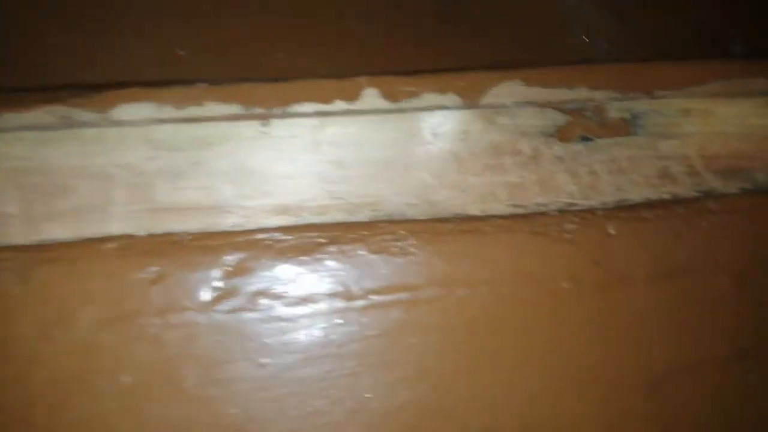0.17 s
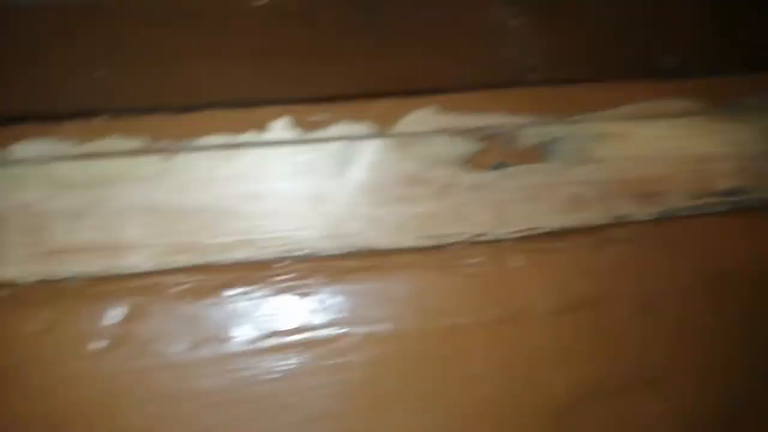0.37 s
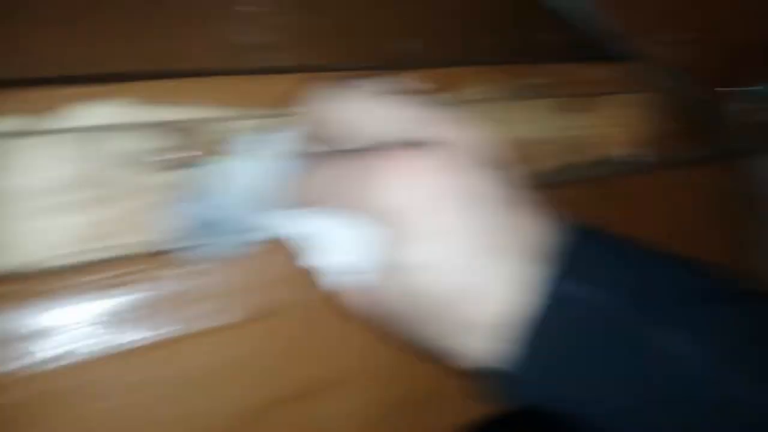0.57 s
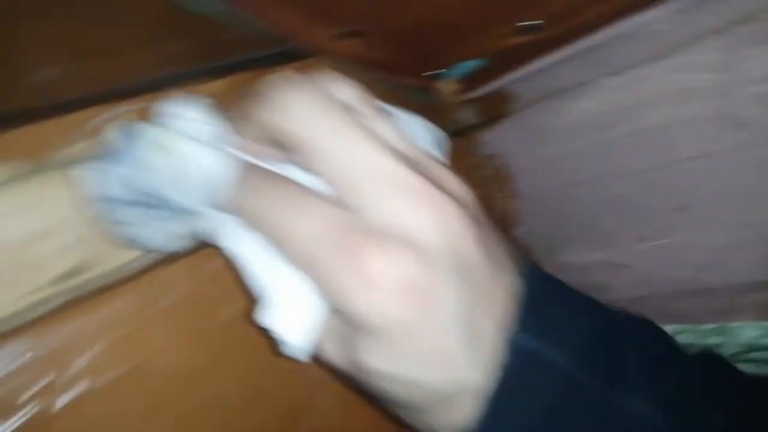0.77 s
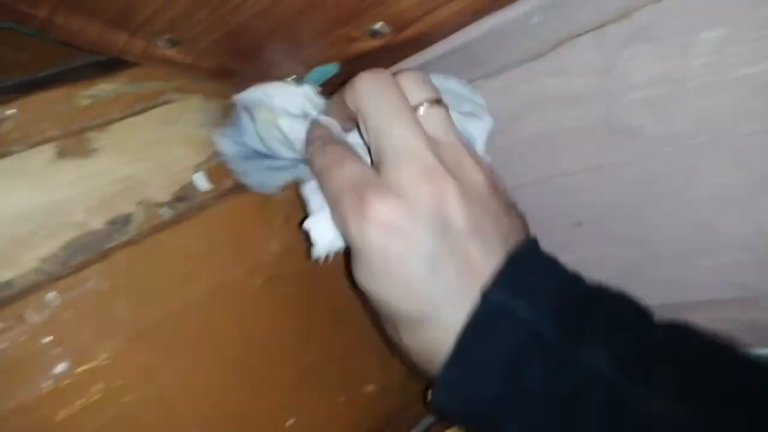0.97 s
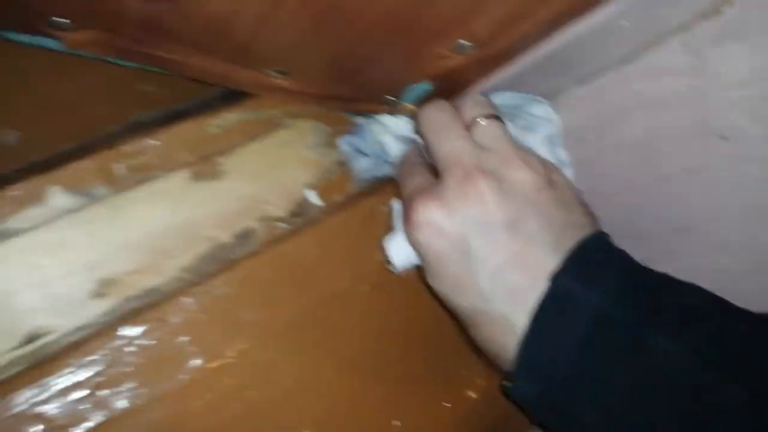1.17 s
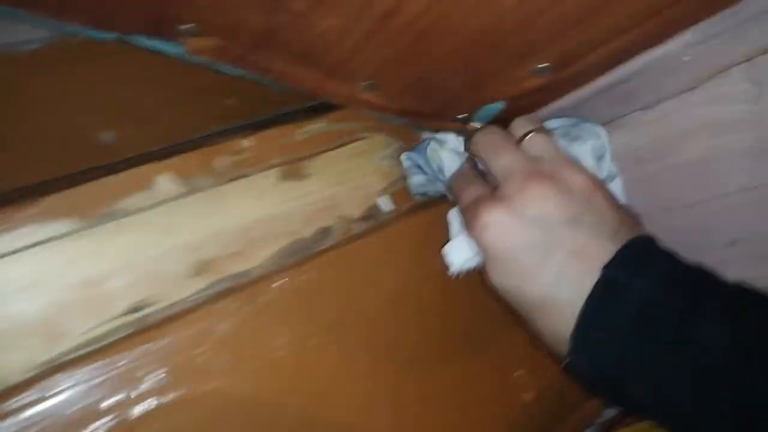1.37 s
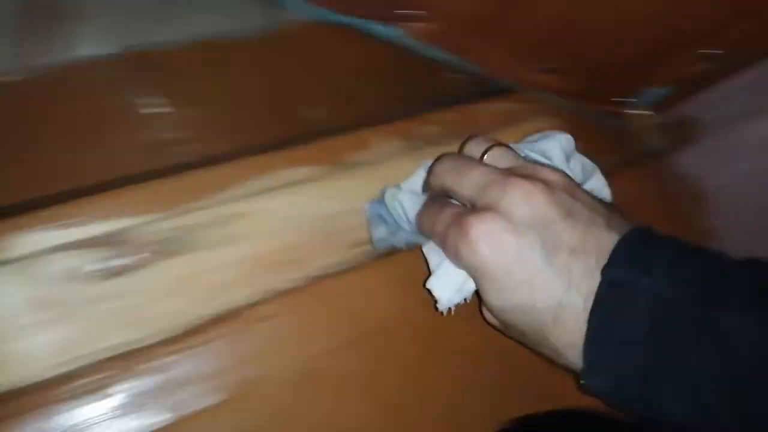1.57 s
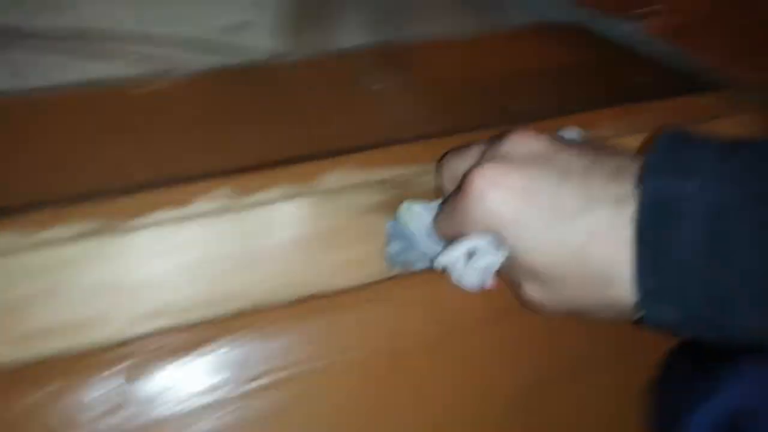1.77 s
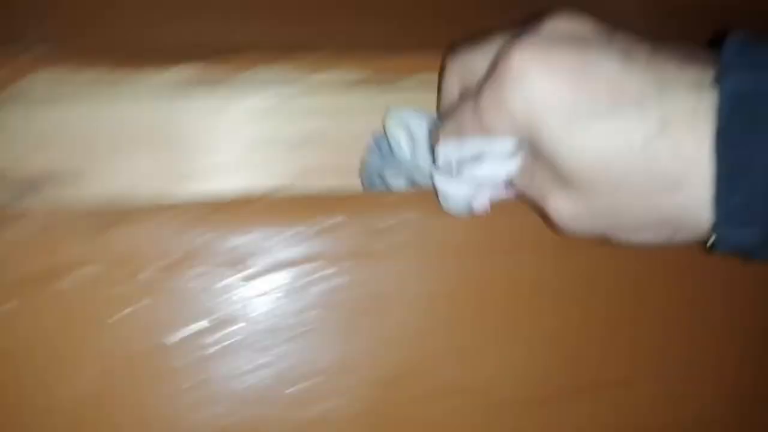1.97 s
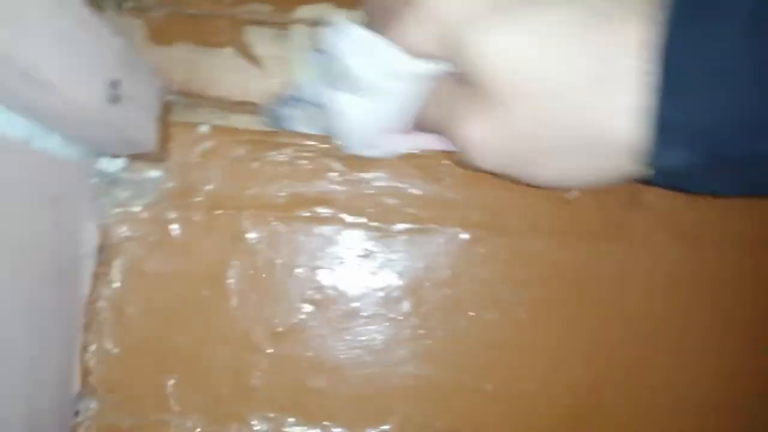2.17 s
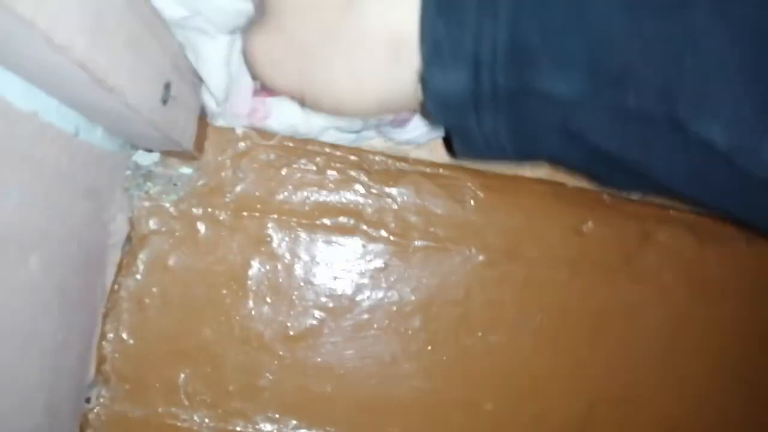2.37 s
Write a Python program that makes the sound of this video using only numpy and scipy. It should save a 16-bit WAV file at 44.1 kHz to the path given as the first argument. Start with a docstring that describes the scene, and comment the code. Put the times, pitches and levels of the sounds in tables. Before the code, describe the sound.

A cloth rag rubs varnished wood, close and dry. A faint brief scuff with a soft bump comes at 0.1 s, then a full wipe swells from 0.35 to 0.7 s, loudest near 0.5. Near silence follows, with a light knock at 0.9 and a faint brush around 1.15. After a soft bump at 1.4, sharp ticks at 1.5 open brisk scrubbing, strongest at 1.6, easing until about 2.3. Low arm rumble and faint hum lie beneath.

```python
"""A rag is wiped to and fro along a varnished wooden door, close to a hand-held microphone.
Its fibres slip in a dense rush of random pulses, coloured by panel resonances, reflections and grip.
It snags on rough spots with small ticks of filtered noise; two soft bumps and a light knock ring modes.
Rumble of the moving arm and a quiet room lie beneath, as shaped noise, with a faint steady hum, a sine
that a noise suppressor lets through by a table of levels."""
import sys
import numpy as np
from scipy import signal
from scipy.fft import rfft, irfft
from scipy.io import wavfile

SR = 44100
rng = np.random.default_rng(int(sys.argv[2]) if len(sys.argv) > 2 else 0)


def int16_out(signal):
    """Quantize to a 16-bit WAV file."""
    q = np.round(np.clip(np.atleast_2d(signal).T, -1, 1) * 32767)
    wavfile.write(sys.argv[1], SR, q.astype(np.int16))


N = 106016
T = np.arange(N) / SR  # time, s


def from_db(db):
    """Level law: decibels to amplitude gain."""
    return 10 ** (np.asarray(db) / 20)


def rms_one(x):
    """Normalisation: scale to unit power."""
    return x / np.sqrt(np.mean(x ** 2) + 1e-20)


def in_time(rows):
    """Linear interpolation: each column of a table against time."""
    start_s, *columns = np.transpose(rows)
    return [np.interp(T, start_s, column) for column in columns]


def coloured(x, points):
    """Spectral shaping: weight a sound by a curve over log frequency, at unit power."""
    pitch_hz, level_db = np.transpose(points)
    bin_hz = np.maximum(np.arange(N // 2 + 1) * SR / N, 1)
    curve_db = np.interp(np.log(bin_hz), np.log(pitch_hz), level_db)
    return rms_one(irfft(rfft(x) * from_db(curve_db), N))


def drift(corner_hz):
    """Low-passed noise: slow random fluctuation with a spread of one."""
    bin_hz = np.arange(N // 2 + 1) * SR / N
    spectrum = rfft(rng.standard_normal(N)) / (1 + (bin_hz / corner_hz) ** 2)
    return rms_one(irfft(spectrum, N))


def lowpass(x, order, corner_hz):
    """Butterworth low-pass: a flat passband below a smooth roll-off."""
    return signal.sosfilt(signal.butter(order, corner_hz, fs=SR, output="sos"), x)


def resonance(x, pitch_hz, width_hz):
    """Two-pole resonance: a band about one frequency, with about unit gain on top."""
    radius = np.exp(-np.pi * width_hz / SR)
    zeros = np.array([1, 0, -1]) * (1 - radius ** 2) / 2
    poles = [1, -(1 + radius ** 2) * np.cos(2 * np.pi * pitch_hz / SR), radius ** 2]
    return signal.lfilter(zeros, poles, x + 1e-18)


def ring(force, modes):
    """Modal superposition: a force excites decaying sinusoids."""
    out = np.zeros(N)
    for pitch_hz, level_db, t60_s in modes:
        radius = from_db(-60 / (t60_s * SR))
        angle = 2 * np.pi * pitch_hz / SR
        poles = [1, -2 * radius * np.cos(angle), radius ** 2]
        out += from_db(level_db) * signal.lfilter([0, np.sin(angle)], poles, force + 1e-18)
    return out


def decay(start_s, length_s):
    """Exponential relaxation: a sudden start, falling to 1/e in one length."""
    return (T >= start_s) * np.exp(-np.abs(T - start_s) / length_s)


def swell(centre_s, half_length_s):
    """Gaussian envelope: a smooth rise and fall, 1/e at the half length."""
    return np.exp(-((T - centre_s) / half_length_s) ** 2)


# strokes of the rag, levels of the rubbing: start_s [s], middle_db, upper_middle_db, treble_db [dB]
WIPE_LEVELS = [
    [(0.0, -71, -62.5, -56), (0.02, -62, -66, -56), (0.026, -62.5, -56, -54), (0.068, -53, -51.5, -45.5),
     (0.095, -57.5, -51.5, -52.5)],
    [(0.122, -62, -56.5, -49.5), (0.128, -67, -64, -60), (0.154, -72.5, -72, -72), (0.184, -74.5, -73, -85),
     (0.236, -85, -78, -77), (0.254, -73.5, -67, -67), (0.302, -73, -70, -66.5), (0.32, -66, -70, -67)],
    [(0.33, -60, -61.5, -56), (0.398, -47.5, -52.5, -51), (0.408, -53.5, -49.5, -56.5),
     (0.486, -41.5, -40.5, -45), (0.55, -44, -43.5, -44), (0.59, -53.5, -52, -52),
     (0.678, -55.5, -59, -57.5), (0.78, -85, -93, -95), (0.86, -82, -79.5, -80)],
    [(0.95, -85, -86, -98), (1.058, -94, -96, -86.5), (1.14, -60, -63, -54.5), (1.182, -61, -62, -56.5),
     (1.242, -79.5, -77.5, -72), (1.266, -83, -89, -96), (1.308, -82.5, -74.5, -72.5),
     (1.378, -71.5, -67, -61.5), (1.47, -71, -68.5, -71)],
    [(1.525, -56, -57.5, -47.5), (1.537, -44.5, -45.5, -46), (1.551, -44.5, -47, -42),
     (1.587, -47, -50.5, -47.5), (1.601, -38, -39.5, -47), (1.615, -41.5, -46, -48),
     (1.649, -44.5, -45, -46.5), (1.7, -47.5, -52, -49)],
    [(1.72, -46.5, -44, -51.5), (1.728, -49.5, -48, -45.5), (1.75, -50.5, -51, -49.5),
     (1.778, -47.5, -49.5, -48), (1.82, -54.5, -53.5, -53), (1.88, -49.5, -49.5, -49.5),
     (1.974, -59, -55.5, -52), (1.99, -52.5, -53, -49), (2.05, -52, -52.5, -52)],
    [(2.07, -51.5, -47, -47.5), (2.104, -49.5, -52, -50), (2.17, -48.5, -54.5, -49.5),
     (2.192, -54, -62.5, -55.5), (2.224, -46, -55, -55), (2.232, -53, -60, -56),
     (2.246, -48.5, -58.5, -59.5), (2.372, -67, -66.5, -66), (2.4, -64.5, -64, -64.5)],
]
# bass of the rubbing passed into the door: start_s [s], level_db [dB]
DOOR_BASS_LEVEL = [(0, -70), (.08, -58), (.16, -79), (.3, -76), (.4, -53.5), (.48, -49), (.54, -44),
                   (.6, -56), (.69, -55), (.78, -74.5), (1.07, -83.5), (1.16, -56.5), (1.26, -93),
                   (1.46, -63), (1.54, -53), (1.62, -52.5), (1.78, -57.5), (1.96, -61.5), (2.07, -52),
                   (2.19, -74), (2.4, -92)]
# borders between bass, middle, upper middle and treble: pitch_hz [Hz]
BAND_SPLITS_HZ = (420, 2500, 6000)
# colour of cloth on wood within the bands: pitch_hz [Hz], level_db [dB]
CLOTH_COLOUR = [(90, -1.5), (160, 2), (250, 1), (400, -3), (600, -3.5), (950, 1), (1500, -1), (2300, -2),
                (3700, -2), (4900, -3.5), (5700, -6.5), (7200, -6), (9200, -6), (11500, -12),
                (13500, -14.5), (15800, -21)]
SLIPS_PER_S, SLIP_SPREAD_DB = 7000, 2  # rate of fibre slips at full pressure; mean spread of their size
FUZZ_DB = -1.5  # smooth rush beneath the slips
PRESSURE_SHARE = 0.2  # share of the middle band's swing in dB that the slip rate follows
JUDDER_DB, JUDDER_HZ = 1.18, 15  # shared by all bands
FLICKER_DB, FLICKER_HZ = 0.68, 29  # separate in each band


def rag():
    """Stick-slip friction: random fibre slips, denser under pressure, swell with each wipe."""
    levels_db = in_time(DOOR_BASS_LEVEL) + in_time([row for wipe in WIPE_LEVELS for row in wipe])
    middle_db = levels_db[1]
    pressure = from_db(PRESSURE_SHARE * (middle_db - middle_db.max()))
    sizes = from_db(SLIP_SPREAD_DB * np.minimum(rng.exponential(1, N), 5))
    sizes = sizes * rng.choice([-1, 1], N)
    happens = rng.random(N) < SLIPS_PER_S * pressure / SR
    # the root keeps the mean power even while the density changes
    slips = rms_one(sizes * happens / np.sqrt(pressure))
    rush = slips + from_db(FUZZ_DB) * rng.standard_normal(N)
    stream = rush * from_db(JUDDER_DB * drift(JUDDER_HZ))
    rub = coloured(panel(reflected(stream)), CLOTH_COLOUR)
    below = []
    for split_hz in BAND_SPLITS_HZ:
        below.append(signal.sosfiltfilt(signal.butter(4, split_hz, fs=SR, output="sos"), rub))
    bands = np.diff([np.zeros(N), *below, rub], axis=0)
    out = np.zeros(N)
    for band, level_db in zip(bands, levels_db):
        flicker_db = FLICKER_DB * drift(FLICKER_HZ)
        out += rms_one(band) * from_db(level_db + flicker_db)
    return out


# close reflections as the hand travels between the sides of the frame:
# start_s [s], first_lag_ms [ms], second_lag_ms [ms], strength [0-1]
FRAME_REFLECTIONS = [(0, .82, .25, 0.07), (.25, 0.73, 0.27, 0.08), (.42, 1.1, 0.58, 0.11),
                     (.62, 0.79, 0.7, 0.08), (1.15, 0.89, 0.24, 0.14), (1.35, 1.05, 0.22, 0.14),
                     (1.6, 0.85, 0.24, 0.15), (1.85, 1.4, 0.61, 0), (1.97, 1.27, 0.834, 0.38),
                     (2.05, 0.89, 0.89, 0.19), (2.12, 0.72, 1.38, 0.28), (2.2, 0.67, 1.77, 0.33),
                     (2.31, 0.36, 1.92, 0.11)]


def reflected(x):
    """Comb interference: two reflections with moving lags, each bouncing twice, join the direct sound."""
    first_ms, second_ms, strength = in_time(FRAME_REFLECTIONS)
    out = x
    for lag_ms in (first_ms, second_ms):
        once = np.interp(T - lag_ms / 1000, T, x)
        twice = np.interp(T - 2 * lag_ms / 1000, T, x)
        out = out + strength * once + strength ** 2 * twice
    return out / np.sqrt(1 + 2 * strength ** 2)


# resonances of the panel that the rubbing excites: pitch_hz [Hz], width_hz [Hz], gain [linear]
PANEL_RESONANCES = [(167, 16, 0.3), (575, 37, 0.97), (712, 25, 0.36), (910, 22, 0.19), (1372, 34, 0.65),
                    (1458, 9, 0.17), (1564, 15, 0.32), (1832, 29, 0.35), (2192, 20, 0.29), (2600, 13, 0.32),
                    (3406, 32, 0.47), (3690, 60, 0.61), (4700, 12, 0.24), (9740, 24, 0.2)]


def panel(x):
    """Forced resonance: the door's narrow modes ring along with the rubbing."""
    return x + sum(gain * resonance(x, pitch_hz, width_hz) for pitch_hz, width_hz, gain in PANEL_RESONANCES)


# regions lifted or shaded by the changing grip:
# centre_s [s], half_length_s [s], pitch_hz [Hz], width_hz [Hz], gain_db [dB]
GRIP_SHADES = [(0.14, 0.56, 900, 270, 3), (.23, 0.16, 2900, 1900, -14), (0.74, 0.027, 1500, 350, 1),
               (0.4, 0.28, 22400, 3400, 10), (1.035, 0.082, 9400, 1400, 11),
               (1.083, 0.043, 16400, 2800, 18.5), (1.31, 0.15, 950, 350, 8.5), (1.31, 0.073, 3950, 740, 8),
               (2.004, 0.082, 1930, 390, 8.5), (2.06, .17, 6240, 2600, -11.5),
               (2.234, 0.067, 1230, 890, 4.5), (2.3, 0.016, 580, 130, 7), (1.453, 0.0065, 1300, 500, 11),
               (1.94, 0.13, 690, 610, -7), (1.4, 0.14, 540, 310, -4), (2.25, 0.027, 1840, 520, 4)]


def grip(x):
    """Time-varying filtering: hollows and folds under the hand colour the rubbing in passing."""
    for centre_s, half_length_s, pitch_hz, width_hz, gain_db in GRIP_SHADES:
        amount = (from_db(gain_db) - 1) * swell(centre_s, half_length_s)
        x = x + amount * resonance(x, pitch_hz, width_hz)
    return x


# catches on rough spots of the wood: start_s [s], level_db [dB], pitch_hz [Hz], width_hz [Hz], length_s [s]
ROUGH_SPOTS = [(.0800, -38, 3020, 4000, 0.0011), (0.0912, -34.5, 2160, 4060, 0.0012),
               (.3392, -38.5, 8200, 9000, .001), (0.3923, -28, 1400, 2200, 0.0016),
               (0.5465, -25.5, 2280, 4000, 0.00088), (1.4813, -16, 7650, 1960, 0.00034),
               (1.4816, -34.5, 4900, 504, 0.003), (1.5138, -24, 11000, 1500, 0.00056),
               (1.5374, -23, 9460, 1800, .0005), (1.584, -30.5, 3960, 3500, .0015),
               (1.5940, -35, 3800, 2470, 0.0011), (1.5988, -27.5, 2020, 3020, 0.00086),
               (2.074, -38.5, 2970, 3500, 0.0016)]
SNAG_CRACK_DB = -25.5  # peak of the crack against the burst
SNAG_TAIL_S, SNAG_TAIL_DB = 0.0047, -22  # the short scatter after the burst


def snags():
    """Impulsive release: each snag lets go in a sharp crack, a tearing burst and a short scatter."""
    out = np.zeros(N)
    for start_s, level_db, pitch_hz, width_hz, length_s in ROUGH_SPOTS:
        click = np.zeros(N)
        click[int(start_s * SR)] = 1
        crack = resonance(resonance(click, pitch_hz, width_hz), pitch_hz, 2 * width_hz)
        crack = from_db(SNAG_CRACK_DB) * crack / np.abs(crack).max()
        tearing = rms_one(resonance(rng.standard_normal(N), pitch_hz, width_hz))
        envelope = decay(start_s, length_s) + from_db(SNAG_TAIL_DB) * decay(start_s, SNAG_TAIL_S)
        out += from_db(level_db) * (crack + tearing * envelope)
    return out


# soft pushes of the hand: start_s [s], level_db [dB], contact_s [s]
HAND_BUMPS = [(0.1023, -26, 0.0013), (0.1037, -35.5, 0.00093), (1.373, -37.5, 0.0037),
              (1.381, -33.5, 0.0058), (1.392, -28, 0.0099), (1.403, -38, 0.0074)]
# low modes of the door: pitch_hz [Hz], level_db [dB], t60_s [s]
DOOR_MODES = [(91.5, -11, .1), (176, -5.5, 0.053), (245, 0.5, 0.0227), (524, 0, .014), (680, -5.5, 0.0095)]


def bumps():
    """Impulse excitation: soft half-sine pushes set off the low modes of the door."""
    force = np.zeros(N)
    for start_s, level_db, contact_s in HAND_BUMPS:
        push = np.sin(np.pi * np.clip((T - start_s) / contact_s, 0, 1))
        force -= from_db(level_db) * push / push.sum()
    return ring(force, DOOR_MODES)


# modes of the knocked wood: pitch_hz [Hz], level_db [dB], t60_s [s]
WOOD_MODES = [(339, -2.5, 0.11), (430, -10, 0.16), (545, -10, 0.11), (1700, -6, .011), (1970, -2.5, 0.01),
              (3380, -2, 0.013), (4050, -2, 0.0072), (5360, -7, .005), (7420, -7, .003)]
KNOCK_S, KNOCK_DB, KNOCK_CONTACT_S = 0.8895, -50, 0.0047
KNOCK_CLICK_DB = -8  # the contact itself, beside the ringing


def knock():
    """Modal excitation by a noisy contact: a light, rough touch clicks and rings the wood."""
    force = rng.standard_normal(N) * decay(KNOCK_S, KNOCK_CONTACT_S)
    force = force / np.sqrt(np.sum(force ** 2))
    return from_db(KNOCK_DB) * (ring(force, WOOD_MODES) + from_db(KNOCK_CLICK_DB) * force)


ROOM_T60_S, ROOM_DB, ROOM_DULL_HZ = 0.19, -19.5, 4870


def room(x):
    """Diffuse reverberation: convolution with a dull, exponentially decaying noise tail."""
    tail = rng.standard_normal(N) * from_db(-60 * T / ROOM_T60_S)
    tail = lowpass(tail, 1, ROOM_DULL_HZ)
    tail = tail / np.sqrt(np.sum(tail ** 2))
    return from_db(ROOM_DB) * signal.fftconvolve(x, tail)[:N]


# swing of the moving arm: start_s [s], level_db [dB]
ARM_LEVEL = [(0, -56), (.1, -43.5), (.22, -64.5), (.35, -62), (.52, -41), (.64, -53.5), (.8, -62),
             (1.03, -74), (1.17, -58.5), (1.28, -62), (1.4, -49), (1.51, -52), (1.555, -35.5), (1.65, -41),
             (1.72, -60), (1.82, -41.5), (1.95, -50), (2.1, -50.5), (2.4, -51.5)]
# spectrum of the arm's rumble: pitch_hz [Hz], level_db [dB]
ARM_COLOUR = [(12, 7), (25, 1), (45, -4), (65, -9.5), (120, -26), (240, -26), (400, -56), (1000, -75)]


def arm_rumble():
    """Low-frequency noise: the moving arm rumbles as its level rises and falls."""
    level_db, = in_time(ARM_LEVEL)
    return from_db(level_db) * coloured(rng.standard_normal(N), ARM_COLOUR)


# level of a steady hum as a noise suppressor lets it through: start_s [s], level_db [dB]
HUM_PASSED = [(0, -54), (.15, -72), (.25, -56), (.45, -50.5), (.62, -47.5), (.8, -62.5), (1.05, -61.5),
              (1.2, -51.5), (1.3, -61.5), (1.6, -48), (1.8, -49), (1.96, -61.5), (2.1, -46), (2.4, -56.5)]
HUM_HZ = 48.4


def hum():
    """Gating: a noise suppressor, given as a table of levels, lets a steady low sine through."""
    level_db, = in_time(HUM_PASSED)
    return from_db(level_db) * rms_one(np.sin(2 * np.pi * HUM_HZ * T))


# spectrum of the quiet room: pitch_hz [Hz], level_db [dB]
AIR_COLOUR = [(25, 4.5), (100, -5.5), (160, -5.5), (240, 2.5), (320, -14.5), (420, -13.5), (1000, -24),
              (3000, -29.5), (8000, -28.5), (12000, -40), (16000, -64)]
AIR_DB = -67


def room_air():
    """Stationary noise: the still air of the room, at a constant level."""
    return from_db(AIR_DB) * coloured(rng.standard_normal(N), AIR_COLOUR)


def scene():
    """Superposition: the rag and its contacts sound in the room, over the background."""
    near = grip(rag()) + snags() + bumps() + knock()
    background = arm_rumble() + hum() + room_air()
    return (near + room(near) + background)[None]


MIC_TOP_HZ, CUTOFF_HZ = 14360, 15750


def record(dry):
    """Band limiting: the microphone dulls the highest treble, then an elliptic filter cuts steeply."""
    dulled = lowpass(dry, 2, MIC_TOP_HZ)
    return signal.sosfilt(signal.ellip(10, 0.1, 80, CUTOFF_HZ, fs=SR, output="sos"), dulled)


dry = scene()
out = record(dry)
int16_out(out)
```